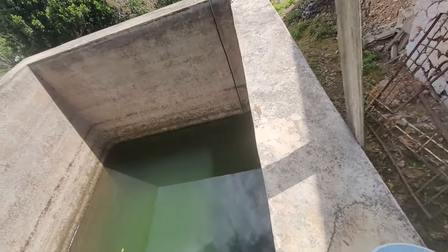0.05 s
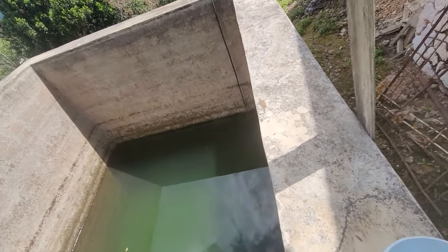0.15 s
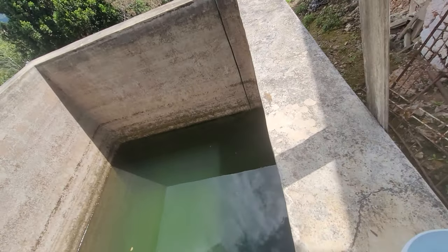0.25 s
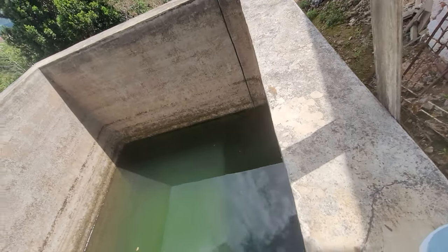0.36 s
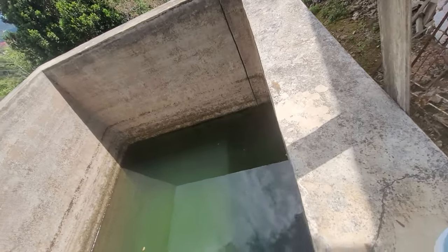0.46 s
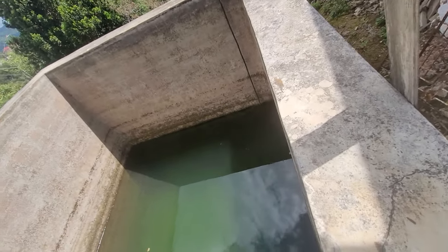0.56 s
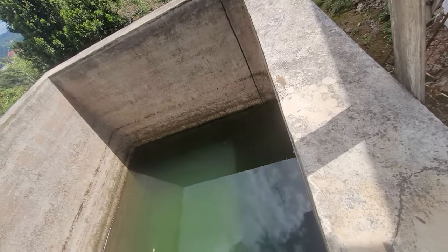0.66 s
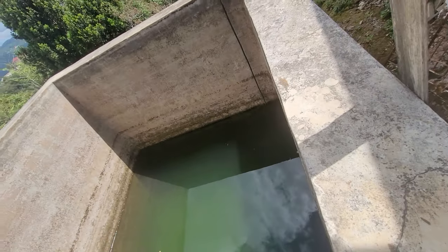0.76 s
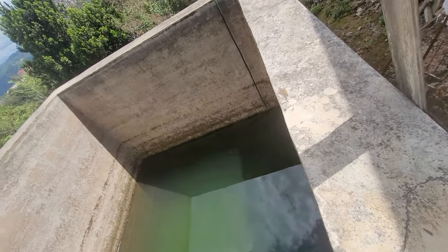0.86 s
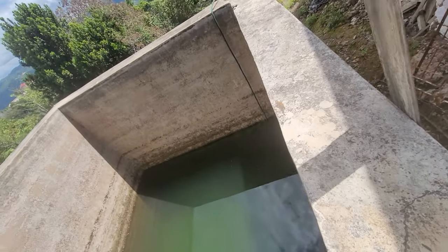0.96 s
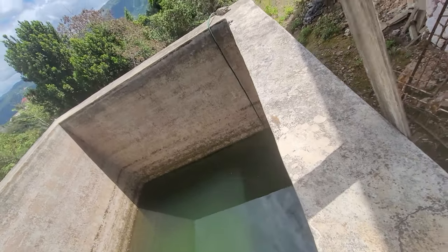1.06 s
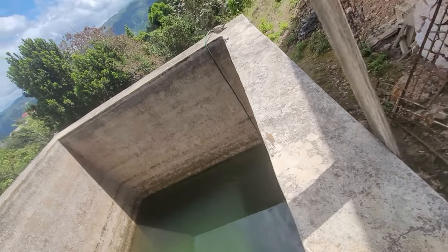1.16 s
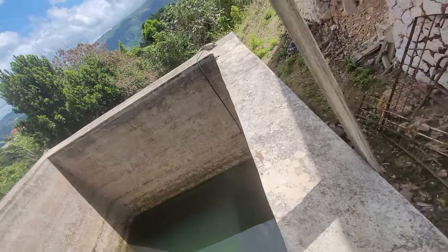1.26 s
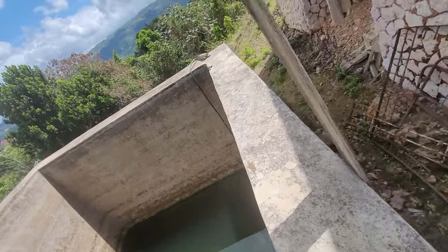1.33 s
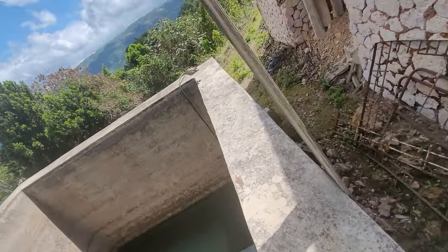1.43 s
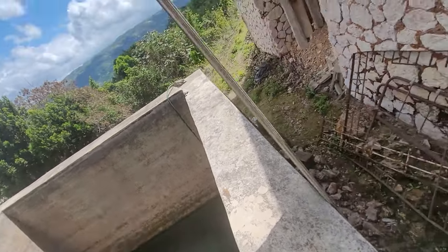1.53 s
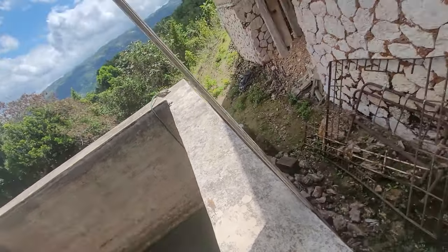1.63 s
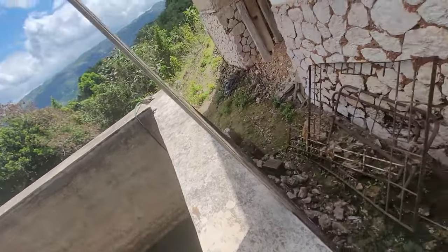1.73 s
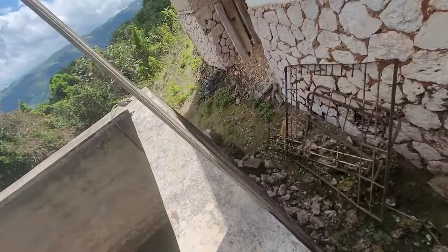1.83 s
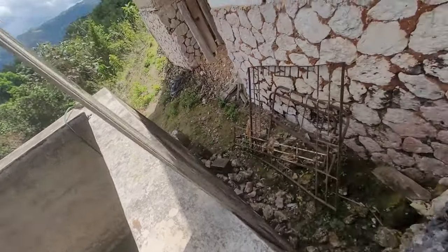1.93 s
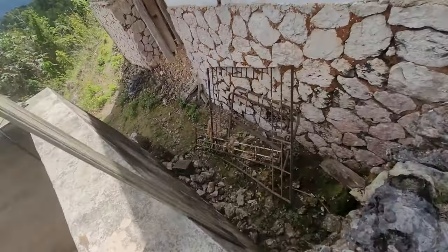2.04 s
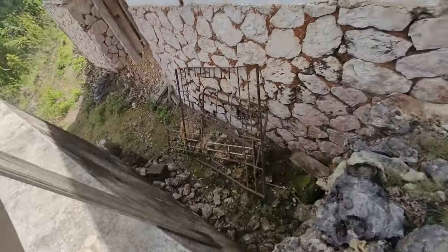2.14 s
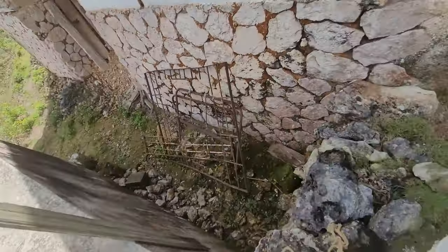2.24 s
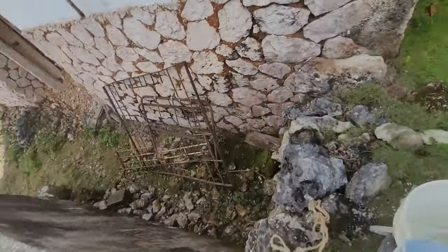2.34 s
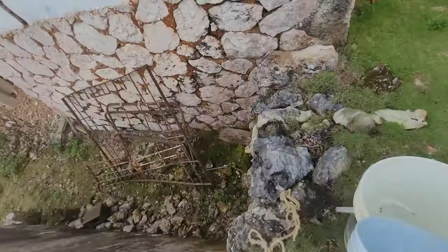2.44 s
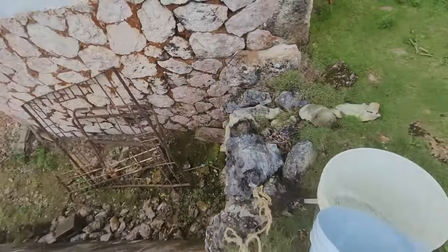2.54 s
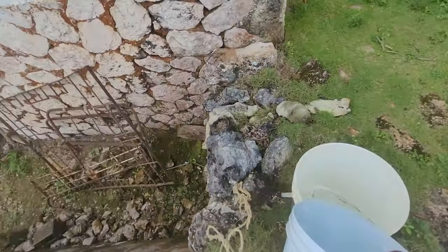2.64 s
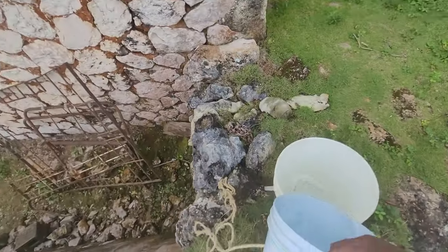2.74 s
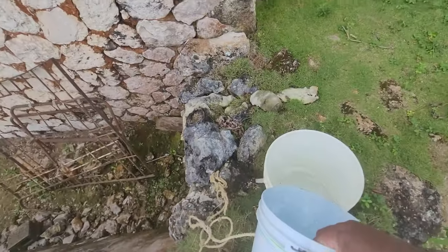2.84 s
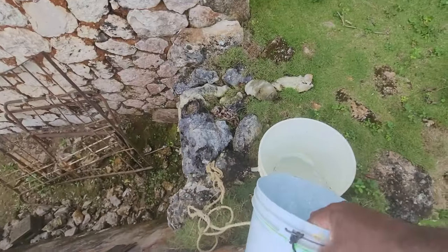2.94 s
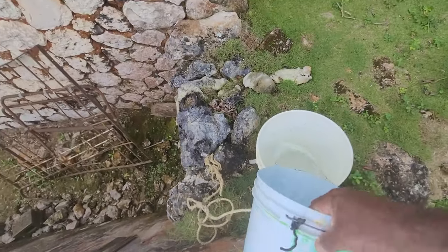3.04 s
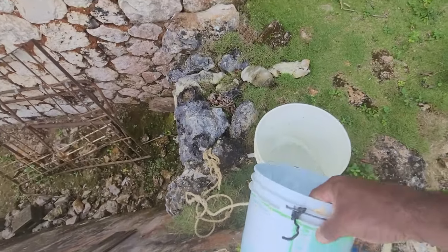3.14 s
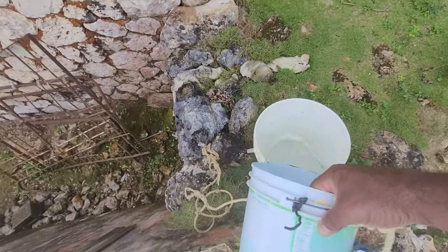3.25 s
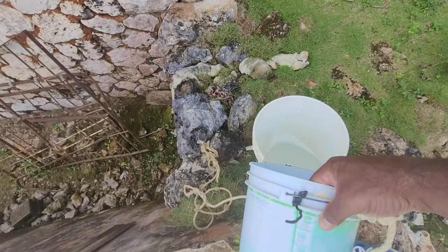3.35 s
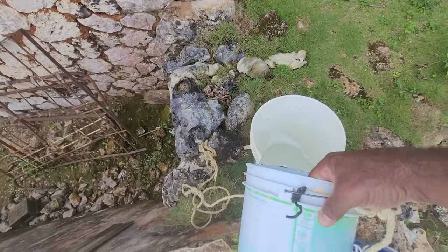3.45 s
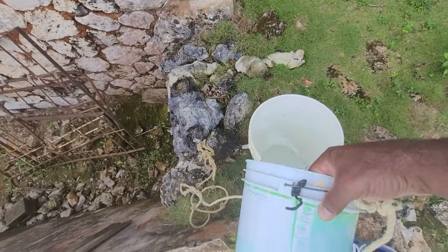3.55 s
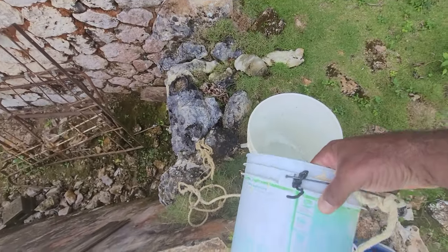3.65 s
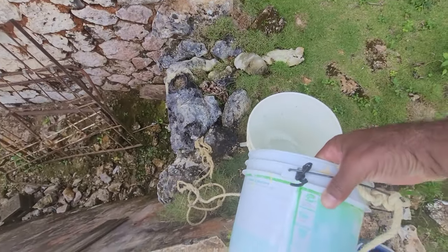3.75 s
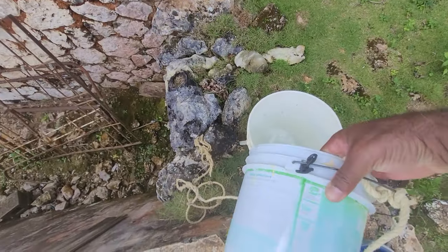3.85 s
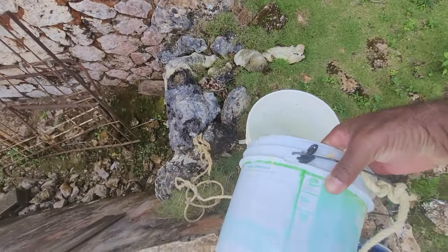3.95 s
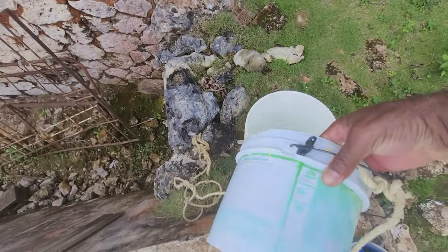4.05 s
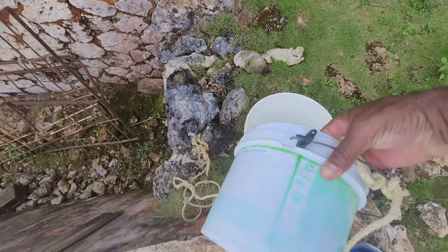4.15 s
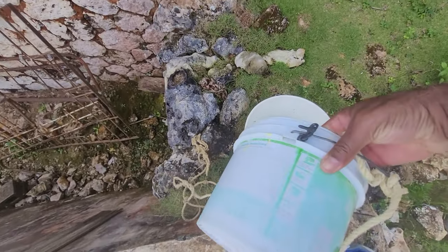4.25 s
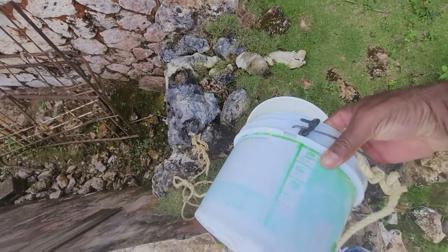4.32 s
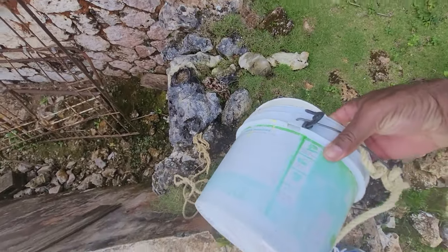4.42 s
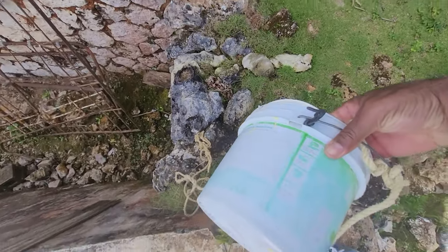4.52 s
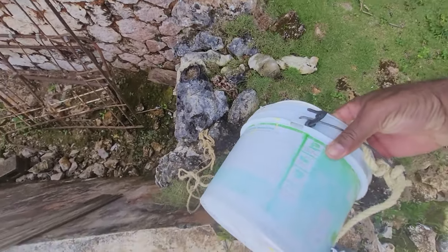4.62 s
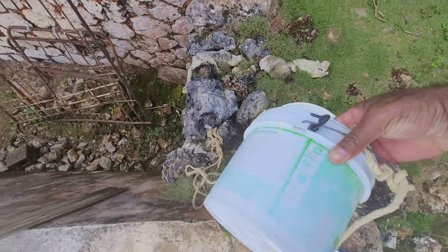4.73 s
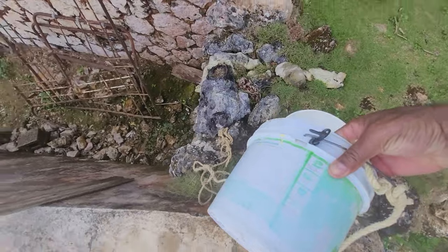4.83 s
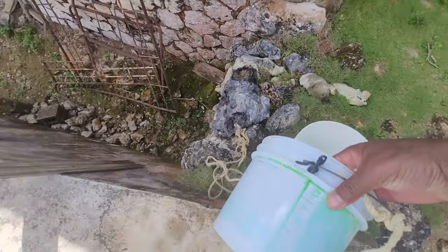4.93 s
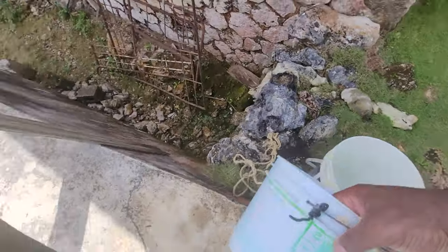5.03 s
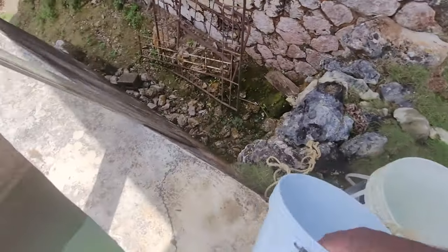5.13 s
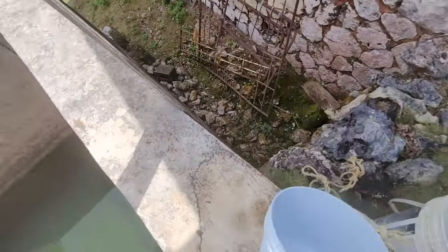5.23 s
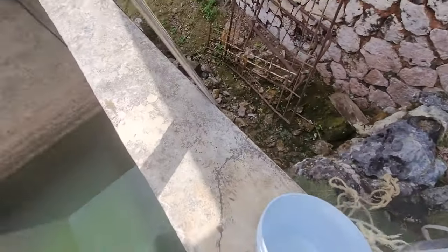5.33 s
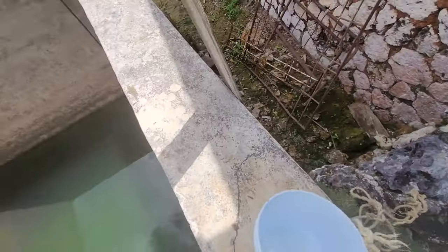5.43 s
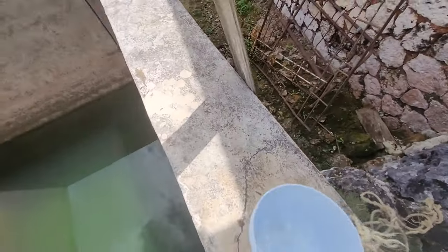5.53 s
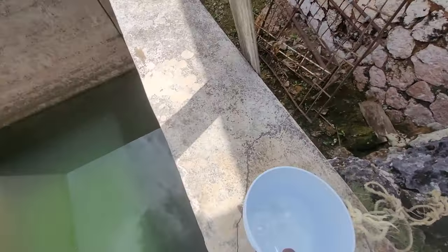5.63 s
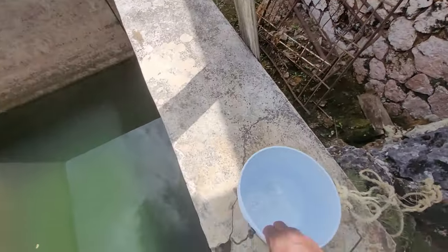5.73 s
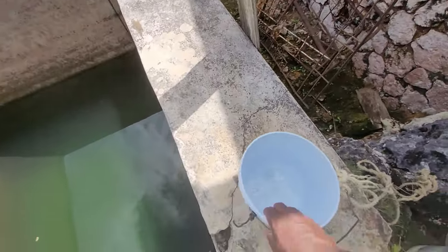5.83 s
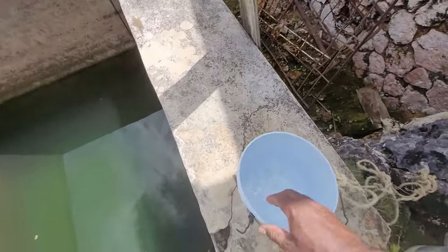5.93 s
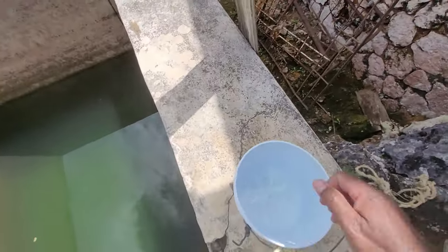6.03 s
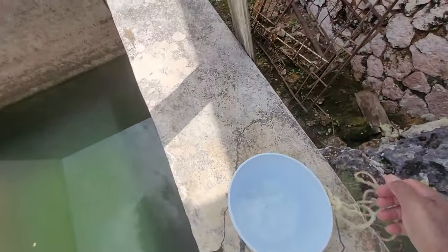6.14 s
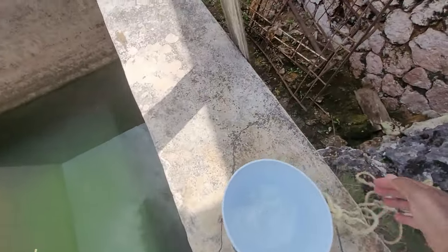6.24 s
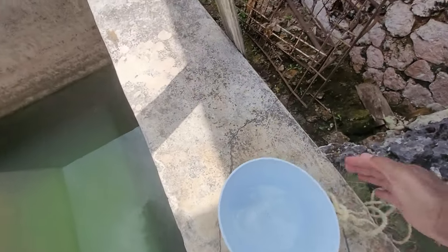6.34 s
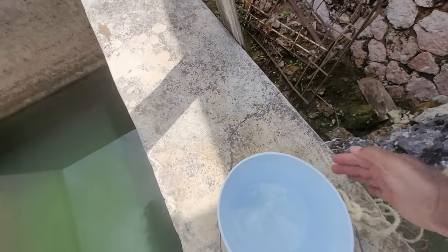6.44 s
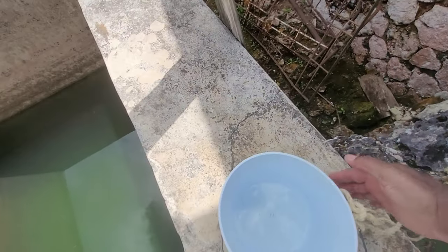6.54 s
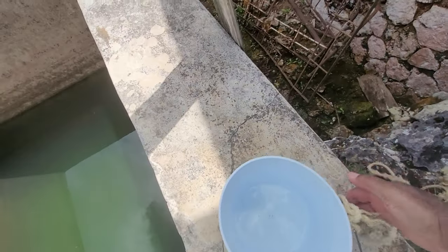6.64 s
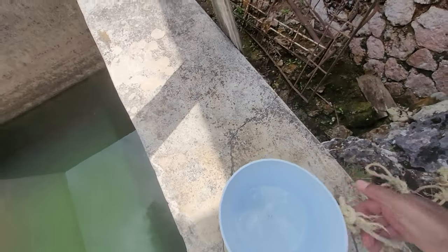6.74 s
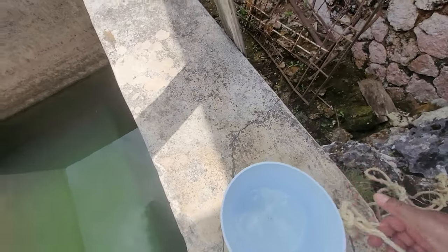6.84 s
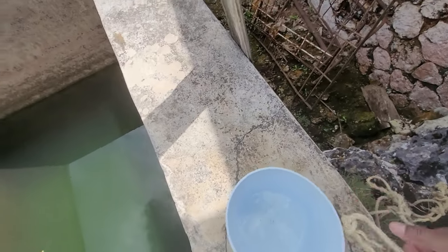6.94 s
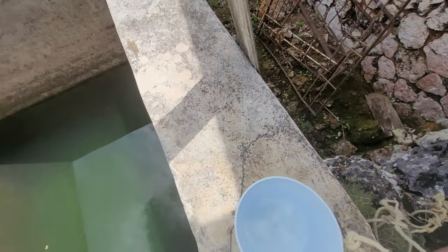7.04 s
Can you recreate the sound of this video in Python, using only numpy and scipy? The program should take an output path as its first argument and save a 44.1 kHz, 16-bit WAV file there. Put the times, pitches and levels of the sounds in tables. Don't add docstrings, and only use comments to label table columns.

```python
import sys
import numpy as np
from scipy import signal
from scipy.io import wavfile
from scipy.ndimage import uniform_filter1d

SR = 44100
rng = np.random.default_rng(int(sys.argv[2]) if len(sys.argv) > 2 else 0)


def field_ratio(decibels):
    return 10 ** (np.asarray(decibels, dtype=float) / 20)


def dump(signal):
    limited = np.clip(np.atleast_2d(signal).T, -1, 1)
    pcm = np.round(limited * 32767).astype(np.int16)
    wavfile.write(sys.argv[1], SR, pcm)


N = 312228

# pitch_hz [Hz], level_db [dB], t60_s [s to fall 60 dB]
BUCKET_TONES = [(150, -21.5, .2), (184, -14, .1), (232.8, -0.5, 0.29), (335, -17.5, 0.12),
                (395.5, -6.5, 0.17), (421, -6, 0.17), (548, -11.5, 0.11), (621, -14, 0.13),
                (782, -16, 0.094), (832, -6, 0.05), (1045, -22, 0.055), (1254, -22.5, 0.13),
                (1548, -15.5, .06), (1790, -20, .08), (2390, -11.5, 0.041), (2820, -5, .03),
                (3300, -9, .025), (3800, -15, .03), (4700, -20, .02)]
# start_s [s], peak_db [dB], pitch_hz [Hz], t60_s [s]
BUCKET_BUMPS = [(1.9, -53, 583, .2), (5.0, -50.5, 239, 0.31), (5.05, -51, 235, .3), (5.1, -46, 245, .3),
                (5.15, -47, 230, .4), (5.235, -43, 235, 0.44), (5.35, -47, 235, .2), (6.02, -30, 207, 0.093),
                (6.079, -28.5, 216, 0.051), (6.178, -32, 182, 0.077), (6.234, -30.5, 150, .06),
                (6.315, -39, 167, .08), (6.421, -26, 74.3, 0.06), (6.47, -30, 90, .08),
                (6.544, -30.5, 138, 0.064), (6.667, -39, 191, 0.14), (6.6, -36, 110, .07),
                (6.82, -40, 190, .1), (6.885, -27, 95.4, 0.048)]
# time_s [s], flow_db [dB]
WATER_FLOW = [(2.17, -41), (2.36, -42), (2.6, -47), (2.8, -46), (3.25, -39.5), (3.5, -37), (3.68, -35.5),
              (4.0, -38), (4.3, -36.5), (4.7, -40), (4.91, -49), (4.97, -62), (5.0, -66)]
# pitch_hz [Hz], level_db [dB per Hz]
SWISH_TONE = [(200, -27), (300, -9), (400, -3), (738, -8), (1030, -1), (1450, -8), (2390, -12), (2940, -30),
              (4840, -120)]


def evened(x):
    return x / np.sqrt(np.mean(x ** 2) + 1e-20)


def read(points, hz):
    f, value = np.transpose(points)
    return np.interp(np.log(hz + 1), np.log(f + 1), value)


def add(mix, s, sound):
    part = mix[..., max(round(s * SR), 0):][..., :sound.shape[-1]]
    part += sound[..., :part.shape[-1]]


def chance():
    return np.random.default_rng(rng.integers(2 ** 31))


def finer(x, count):
    return np.array([np.interp(np.arange(count), np.arange(len(row)) * 44, row) for row in x])


def wander(count, size):
    x = chance().standard_normal((count, 2)).T
    return evened(uniform_filter1d(uniform_filter1d(x, size=size), size=size))


def resonate(x, hz, width):
    turn = np.exp(2j * np.pi * np.cumsum(hz * np.ones(x.shape[-1])) / SR)
    r = np.exp(-np.pi * width / SR)
    smooth = signal.lfilter([1 - r], [1, -r], x / turn + 1e-18)
    return 2 * (turn * smooth).real


def noise(count, spectrum, size, like=0.94, lag=0., left_db=0., patchy_db=0., flicker_db=0.):
    # pitch_hz [Hz], likeness [0 to 1]
    likeness = [(60, 0.99), (300, 1), (700, 0.81), (1500, 0.46), (4000, 0.28), (10000, 0.18)]
    hop, hz = size // 2, np.fft.rfftfreq(size, 1 / SR)
    a, b, c, d, patches = chance().standard_normal((count // hop + 3, len(hz), 5)).T
    flicker = evened(uniform_filter1d(patches[1], size=2))
    patches = evened(uniform_filter1d(uniform_filter1d(patches, size=5, axis=0), size=3, axis=1))
    same = np.clip(like * read(likeness, hz), 0, 1)[:, None]
    right = a + 1j * b
    delay = np.exp(-2j * np.pi * hz * lag / SR)[:, None]
    left = same * right * delay + np.sqrt(1 - same ** 2) * (c + 1j * d)
    level_db = read(spectrum, hz)[:, None] + patchy_db * patches + flicker_db * flicker
    z = np.array([left, right]) * field_ratio(level_db)
    x = signal.istft(z, nperseg=size, noverlap=hop, window="cosine")[1][:, :count]
    return evened(x) * field_ratio(np.array([[left_db], [-left_db]]) / 2)


def nearby(x, lag, left_db, wet_db, t60):
    t = np.arange(4096) / SR
    tail = rng.standard_normal((2, len(t))) * field_ratio(-60 * t / t60) * (t > .0005)
    tail = signal.lfilter(*signal.butter(1, 700, "high", fs=SR), tail)
    tail *= field_ratio(wet_db) / np.linalg.norm(tail[0])
    tail[0, round(lag)] += 1
    tail[1, 0] += 1
    sides = field_ratio(np.array([[left_db], [-left_db]]) / 2)
    return signal.oaconvolve(x[None], tail * sides, axes=1)[:, :len(x)]


def pings(events, t60, fuzz, gain_db):
    out, t = np.zeros(N), np.arange(1200) / SR
    draws = chance().standard_normal((len(events), 2, len(t)))
    for (s, db, hz, snap_db), (grit, blur) in zip(events, draws):
        blurred = resonate(resonate(blur, hz, 1.22 * hz), hz, 1.22 * hz)
        ring = np.sin(2 * np.pi * hz * t) + fuzz * evened(blurred)
        snap = field_ratio(snap_db) * np.diff(grit, prepend=0)
        attack = np.minimum(t * hz * 2, 1)
        add(out, s, field_ratio(db + gain_db - 60 * t / t60) * (ring + snap) * attack)
    return out


def modes(table, rise, blur):
    t = np.arange(SR // 4) / SR
    ring = np.zeros(len(t))
    for hz, db, t60 in table:
        uneven = 1 + blur * wander(len(t), size=150)[0]
        ring += field_ratio(db - 60 * t / t60) * np.sin(2 * np.pi * hz * t) * uneven
    return ring * np.minimum(t / rise, 1)


def decays(rows, start, count):
    t = start + np.arange(0, count, 44) / SR
    power = np.zeros(len(t))
    for s, db, t60 in rows:
        power += np.clip((t - s) / .004, 0, 1) * field_ratio(2 * db - 120 * np.abs(t - s) / t60)
    return finer([np.sqrt(power)], count)[0]


def stroke(start, peak, t60, bend):
    t = np.arange(0, peak - start + .7 * t60, 1 / SR)
    fade = field_ratio(-60 * np.maximum(t - peak + start, 0) / t60)
    return np.minimum(t / (peak - start), 1) ** bend * fade


def background_air():
    air_tone = [(130, -13), (250, 0), (500, -8.5), (800, -15.5), (1300, -21), (3200, -24.5), (4600, -21),
                (6300, -26.5), (8000, -21.5), (10000, -27.5), (13000, -24), (16000, -25.5)]
    return field_ratio(-67.7) * noise(N, air_tone, size=1024, like=.6, patchy_db=3.0)


def wind():
    # pitch_hz [Hz], level_db [dB per Hz]
    gust_tone = [(15, -33), (30, -9.5), (55, -1.5), (75, -4.5), (110, -16.5), (170, -28.5), (300, -48.5),
                 (500, -82)]
    # peak_s [s], peak_db [dB], left_minus_right_db [dB], fall_s [s to fall 20 dB]
    gust_times = [(.08, -47, 25, .07), (.33, -64, -23, .2), (.81, -50.5, -15, .09), (.93, -58, 18, .1),
                  (1.14, -52, -29, .08), (1.28, -49, -22, .1), (1.42, -39, -37, .09), (1.61, -47, -6, .15),
                  (1.76, -40, -14, .09), (1.99, -53, -25, .1), (2.06, -47, -2, .09), (2.34, -54, -3, .12),
                  (2.5, -42, -30, .06), (2.9, -66, 0, .2), (3.45, -63, 5, .15), (4.05, -60, -1, .3),
                  (4.7, -52, 16, .25), (5.03, -40, 16, .2), (5.2, -46, -10, .2), (5.34, -41.5, 15, .11),
                  (5.55, -57, -25, .06), (5.72, -51, -3, .18), (6.26, -39.5, -7, .18), (6.5, -34, -14, .1),
                  (6.68, -43, -3, .2), (6.87, -46, -15, .1), (7.02, -57, -15, .1)]
    calm_db = -76
    t = np.arange(0, N, 44) / SR
    power = field_ratio(2 * calm_db) * np.ones((2, len(t)))
    for s, db, pan_db, fall_s in gust_times:
        share = 1 / (1 + field_ratio(-2 * np.clip(pan_db, -30, 30)))
        power = power + np.outer([share, 1 - share], field_ratio(2 * (db - 20 * np.abs(t - s) / fall_s)))
    thud = noise(N, gust_tone, size=4096, like=.15)
    lumps = wander(N, size=1200)
    return 0, evened(thud * field_ratio(2.0 * lumps)) * field_ratio(6.5) * finer(np.sqrt(power), N)


def bird():
    # start_s [s], level_db [dB], from_hz [Hz], to_hz [Hz]
    chip_calls = [
        (1.544, -79, 5200, 5770),
        (5.322, -59, 6300, 8000),
        (5.785, -58.5, 7600, 9000),
        (6.338, -56, 6260, 8400),
    ]
    out, t = np.zeros(N), np.arange(1100) / 1100
    for s, db, low_hz, high_hz in chip_calls:
        sweep = np.sin(2 * np.pi * np.cumsum(low_hz + (high_hz - low_hz) * t) / SR)
        add(out, s, field_ratio(db) * sweep * np.sin(np.pi * t) ** .5)
    echo = rng.standard_normal((2, SR // 2)) * field_ratio(-60 * np.arange(SR // 2) / SR / 0.53)
    return signal.oaconvolve(out[None], echo / np.linalg.norm(echo[0]) * 3, axes=1)[:, :N]


def insect():
    # start_s [s], peak_s [s], t60_s [s], level_db [dB]
    flight = (1.78, 2.1, 1.5, -68)
    buzz_tone = [(5500, -30), (7200, -2), (9500, -1), (11000, -30)]
    s, peak, t60, db = flight
    swell = stroke(s, peak, t60, bend=.8)
    return s, field_ratio(db) * swell * noise(len(swell), buzz_tone, size=256, patchy_db=1.5)


def drag(row, hollow, bright, bend):
    s, peak, t60, rub_db, grit_db = row
    push = stroke(s, peak, t60, bend)
    rub = noise(len(push), hollow, size=1024, lag=14, left_db=-3.0, patchy_db=2.5)
    grit = noise(len(push), bright, size=128, lag=10, left_db=-3.5, patchy_db=1.5, flicker_db=2.0)
    return s, field_ratio(rub_db + 1.5) * push * (rub + field_ratio(grit_db + 2.0) * grit)


def scrapes():
    # start_s [s], peak_s [s], t60_s [s], rub_db [dB], grit_over_rub_db [dB]
    first_shift = (.46, .53, 1.0, -58, -7)
    drag_strokes = [
        (.686, .697, .05, -51, 0),
        (.745, .803, .3, -43, -13),
        (.8, .932, .08, -42.5, -9),
        (1.87, 1.91, .55, -62, -5),
    ]
    # pitch_hz [Hz], level_db [dB per Hz]
    rub_tone = [(88, -42.5), (150, -15.5), (385, -8), (468, 0), (574, -15), (689, 0), (780, -10), (867, -5),
                (1050, -21.5), (1270, -5), (1420, -23), (1930, -19), (2370, -12), (3250, -43), (5500, -120)]
    grit_tone = [(710, -32), (1200, -8), (1310, -1), (1410, -16), (2400, -6.5), (2920, -12.5), (4500, -13),
                 (14200, -20.5), (16000, -28)]
    shift = drag(first_shift, SWISH_TONE, grit_tone, bend=.6)
    return [shift, *(drag(row, rub_tone, grit_tone, bend=.6) for row in drag_strokes)]


def swing_back():
    swing_strokes = [
        (4.97, 5.01, .3, -55, -4),
        (5.05, 5.1, .5, -51, -10),
        (5.1, 5.2, .35, -44.5, -7),
        (5.287, 5.294, .12, -42, -22),
        (5.2, 5.34, .3, -58, -12),
        (5.2, 5.32, 2.2, -76, 12),
        (5.55, 5.74, .3, -64, -6),
    ]
    # pitch_hz [Hz], level_db [dB per Hz]
    rustle_tone = [(1180, -33), (2000, -6), (2930, -4.5), (5250, -5), (8700, -11), (12000, -11),
                   (16000, -16)]
    return [drag(row, SWISH_TONE, rustle_tone, bend=1.6) for row in swing_strokes]


def handle_ticks():
    # start_s [s], peak_db [dB], pitch_hz [Hz], snap_over_peak_db [dB]
    tick_times = [(0.432, -51, 7570, -10), (0.703, -23, 2300, -17), (0.804, -29, 1260, -11),
                  (0.909, -30, 4700, -8), (0.914, -32, 1250, -14), (0.931, -33, 1200, -10),
                  (1.933, -50, 600, -20), (1.863, -42.5, 2140, -11), (2.122, -50, 2100, -4),
                  (5.009, -31, 1080, -26), (5.092, -42, 1240, -20), (5.145, -34, 1110, -23),
                  (5.293, -38, 980, -14), (6.03, -48, 2100, -17), (6.051, -44, 1760, -17),
                  (6.068, -50, 1250, -20), (6.131, -49, 2300, -10), (6.178, -41, 2600, -8)]
    # (pitch_hz [Hz], level_db [dB], t60_s [s])
    handle_clack = (.7015, -30, [(462, -6, 0.12), (673, 0, 0.12), (890, -17, .05), (1314, -12, 0.05),
                    (2121, 1, 0.035), (2347, 4, .04), (3138, 0, 0.017), (4032, 1, 0.022),
                    (5340, -5, 0.017)])
    out = pings(tick_times, t60=.014, fuzz=1.0, gain_db=-6)
    s, blow_db, tones = handle_clack
    add(out, s, field_ratio(blow_db) * modes(tones, rise=0.003, blur=0.49))
    return nearby(out, lag=9, left_db=-3, wet_db=-4, t60=.03)


def rattle():
    # start_s [s], level_db [dB], t60_s [s]
    rattle_kicks = [
        (5.809, -21, .07),
        (5.82, -35, .33),
        (5.97, -57, .8),
        (6.02, -52, .25),
        (6.176, -63, .1),
        (6.35, -74, 1.2),
    ]
    patter_tone = [(530, -39), (900, -7.5), (1370, -9.5), (1570, 1.5), (2020, -11.5), (2500, -9),
                   (4050, -20.5), (7140, -17.5), (8980, -26.5), (16000, -31)]
    s = rattle_kicks[0][0]
    patter = noise(SR, patter_tone, size=128, lag=5.2, left_db=-1.5, flicker_db=2.5)
    return s, decays(rattle_kicks, s, SR) * patter


def rocking():
    # start_s [s], level_db [dB], t60_s [s]
    wobbles = [
        (5.88, -22, .11),
        (5.9, -43, 2.6),
    ]
    s = wobbles[0][0]
    n = N - round(s * SR)
    again = [(at, db - 16, .25) for at, db, hz, _ in BUCKET_BUMPS if at > s and hz > 160]
    spectrum = [(100, 1.5), (330, 3.5), (450, 0), (600, -13), (900, -16), (1300, -31)]  # (Hz, dB per Hz)
    shake = noise(n, spectrum, size=512, flicker_db=4.0)
    low = BUCKET_TONES[:10] + [(685, -4, .2)]
    ring = sum(field_ratio(0.6 * db) * resonate(shake, hz, 33) for hz, db, t60 in low)
    return s, field_ratio(3.0) * decays(wobbles + again, s, n) * evened(ring) * signal.windows.tukey(n, .03)


def knock():
    # [extra decay rate, in tens per s]
    landing = (5.8082, -7, 5.892, 22)
    s, db, settle, damping = landing
    ring = modes(BUCKET_TONES, rise=.0007, blur=.15)
    since_flat = np.maximum(np.arange(len(ring)) / SR - settle + s, 0)
    return s, field_ratio(db) * ring * np.exp(-damping * 10 * since_flat)


def bucket_blows():
    body = np.zeros(N)
    for s, db, hz, t60 in BUCKET_BUMPS:
        add(body, s, modes([(hz, db, t60)], rise=0.0029, blur=0.23))
    add(body, *knock())
    body = signal.lfilter(*signal.butter(2, 60, "high", fs=SR), body)
    return nearby(body, lag=6, left_db=-2.0, wet_db=-5.0, t60=0.033)


def slaps_and_drips():
    # start_s [s], peak_db [dB], pitch_hz [Hz], snap_over_peak_db [dB]
    slap_times = [(2.1823, -41, 7800, 4), (2.243, -28, 4450, -9), (2.613, -27, 7950, -4),
                  (2.655, -25, 4000, 4), (2.6848, -20.5, 7430, -12), (2.8939, -27, 4070, -2),
                  (3.2269, -20.5, 2390, -13), (3.272, -20, 2980, -11), (3.4486, -19, 2300, -17),
                  (3.5158, -15, 1110, -16), (3.6386, -18, 2440, -11), (3.7426, -17, 2740, -19),
                  (3.8514, -23, 2390, -17), (3.9726, -18.5, 2440, -18), (4.2778, -16, 3700, -22),
                  (4.4971, -23, 2570, -17), (4.562, -17, 2500, 2), (4.6345, -18, 7380, -8),
                  (4.6644, -5, 4350, -25), (4.6727, -14.5, 3940, -21)]
    drip_times = [
        (4.7256, -25, 2380, -19),
        (4.7514, -21, 4100, -21),
        (4.774, -23, 2600, -17),
        (4.8354, -31, 3990, -1),
        (4.8653, -29, 2630, -16),
        (4.9095, -30.5, 7540, -11),
    ]
    drops = pings(slap_times + drip_times, t60=.014, fuzz=.7, gain_db=-5)
    return nearby(drops, lag=3, left_db=-1.5, wet_db=-5, t60=.028)


def bubbles(count, spectrum, low_hz, high_hz, per_s, cycles, spread_db):
    big, when, kind = chance().random((count, 3)).T
    size = field_ratio(-spread_db * np.log(big + .007)) * (when < per_s / SR)
    out, pitches = np.zeros(count), np.geomspace(low_hz, high_hz, 8)
    for k, hz in enumerate(pitches):
        u = np.arange(round(3 * cycles * SR / hz)) * hz / SR
        ping = np.sin(2 * np.pi * u * (1 + .008 * u)) * np.exp(-2.3 * u / cycles) * np.minimum(u, 1)
        chosen = size * (np.floor(kind * len(pitches)) == k)
        out += field_ratio(read(spectrum, hz)) * hz * signal.oaconvolve(chosen, ping)[:count]
    return evened(nearby(out, lag=4, left_db=-1.5, wet_db=0.5, t60=0.061))


def thumps(start, count):
    # start_s [s], peak_db [dB], pitch_hz [Hz], t60_s [s]
    water_lumps = [(2.233, -34, 202, 0.14), (2.282, -33, 205, 0.14), (2.323, -37, 205, 0.14),
                   (2.421, -40, 226, 0.14), (2.519, -38, 229, 0.14), (2.621, -44, 215, 0.14),
                   (2.724, -40, 207, 0.14), (2.759, -38, 210, 0.14), (2.815, -48, 237, 0.14),
                   (2.922, -33, 199, 0.14), (2.979, -36, 207, 0.14), (3.022, -39, 194, 0.14),
                   (3.105, -28, 207, 0.14), (3.153, -34, 285, 0.14), (3.189, -38, 205, 0.14),
                   (3.253, -37, 215, 0.14), (3.312, -34, 213, 0.14), (3.359, -34, 226, 0.14),
                   (3.399, -28, 221, 0.14), (3.502, -33, 310, 0.14), (3.565, -29, 221, 0.14),
                   (3.618, -31, 213, 0.14), (3.649, -29, 310, 0.14), (3.701, -32, 218, 0.14),
                   (3.79, -32, 221, 0.14), (3.832, -27, 310, 0.14), (3.869, -31, 215, 0.14),
                   (3.9, -28, 304, 0.14), (3.973, -32, 301, 0.14), (4.082, -24, 231, 0.14),
                   (4.137, -29, 229, 0.14), (4.161, -27, 283, 0.14), (4.235, -26, 285, 0.14),
                   (4.254, -25, 283, 0.14), (4.289, -28, 272, 0.14), (4.324, -29, 272, 0.14),
                   (4.357, -21, 256, 0.14), (4.428, -31, 253, 0.14), (4.486, -31, 266, 0.14),
                   (4.534, -29, 266, 0.14), (4.551, -26, 261, 0.14), (4.595, -31, 264, 0.14),
                   (4.665, -28, 301, 0.14), (4.699, -32, 261, 0.14), (4.763, -34, 248, 0.14),
                   (4.799, -33, 234, 0.14), (4.834, -40, 266, 0.14), (4.866, -33, 237, 0.14)]
    out, t = np.zeros(count), np.arange(8000) / SR
    rise = np.minimum(t / .016, 1) ** 1.5
    for s, db, hz, t60 in water_lumps:
        add(out, s - start, field_ratio(db + 5 - 60 * t / t60) * np.sin(2 * np.pi * hz * t) * rise)
    return out


def levels(start, count):
    # start_s [s], swell_db [dB], fade_s [s], extra_spray_db [dB]
    gulp_times = [(2.21, 5, .05, 0), (2.29, 5, .06, -1), (2.35, 3, .05, 3), (2.5, 5, .04, 0),
                  (2.653, 3, .09, 7), (2.735, 3, .04, 3), (2.885, 4, .04, 0), (2.968, 2, .04, 0),
                  (3.024, 2, .05, 1), (3.105, 3, .03, 0), (3.228, 5, .04, 2), (3.262, 5, .06, 0),
                  (3.383, 2, .03, 0), (3.42, 2, .03, 4), (3.445, 8, .015, -1), (3.505, 9, .04, 1),
                  (3.55, 4, .03, 1), (3.638, 6, .06, 1), (3.716, 3, .03, 0), (3.743, 4, .03, 0),
                  (3.845, 7, .04, -4), (3.973, 3, .04, 1), (4.065, 3, .04, -1), (4.15, 2, .03, 1),
                  (4.235, 4, .05, 0), (4.279, 4, .03, -1), (4.2, 3, .03, 0), (4.345, 4, .03, -2),
                  (4.4, 5, .04, 1), (4.49, 4, .03, 1), (4.558, 5, .02, 6), (4.6, 4, .03, 1),
                  (4.633, 2, .02, 6), (4.662, 4, .025, 0), (4.7, 2, .02, 2), (4.72, 3, .02, 0),
                  (4.75, 4, .02, 2), (4.775, 5, .03, 0), (4.835, 3, .03, 0), (4.905, 3, .02, 2)]
    arrive_s = [.045, .02, .008, .04]
    follow_flow = [1.0, 1.4, .9, .8]
    empty_level_db = [-37.5, -39, -34, -51]
    full_level_db = [-39.5, -41, -41.5, -46]
    gulp_part = [.75, 1.0, .8, .1]
    full_s, fill_bend = 4.3, 1.6
    t = start + np.arange(0, count, 44) / SR
    flow_db = np.interp(t, *np.transpose(WATER_FLOW)) + 40
    fill = np.minimum((t - start) / (full_s - start), 1) ** fill_bend
    s, swell_db, fade, spray_db = np.transpose(gulp_times)[..., None]
    shape = np.clip((t - s) / .006, 0, 1) * np.exp(-((t - s) / fade) ** 2)
    layers = np.array([arrive_s, follow_flow, empty_level_db, full_level_db, gulp_part])
    arrive, follow, empty_db, full_db, share = layers[..., None]
    gulp_db = share * (swell_db * shape).sum(0) + np.outer([0, 0, 1, 0], (spray_db * shape).sum(0))
    rise = np.clip((t - start - arrive) / .03, 0, 1)
    level_db = empty_db + (full_db - empty_db) * fill + follow * flow_db + gulp_db
    return finer(rise * field_ratio(level_db), count)


def pour():
    # pitch_hz [Hz], level_db [dB per Hz]
    gurgle_tone = [(220, -29), (380, 5.5), (409, -5.5), (517, -10), (677, 0), (893, -7), (1070, 0),
                   (1360, -5.5), (1470, -2), (1650, -14), (2140, -38.5), (3630, -120)]
    slap_tone = [(1000, -32), (1700, -3.5), (1860, -1.5), (2140, -6.5), (2330, -0.5), (3500, -5.5),
                 (4550, -35.5), (7700, -120)]
    spray_tone = [(2120, -33), (3600, -5.5), (3760, -2.5), (4080, -3), (6350, -7), (7660, -5.5),
                  (8950, -12), (11500, -7), (15100, -12), (16000, -22.5)]
    # time_s [s], pitch_hz [Hz]
    boom_pitch = [
        (2.17, 201),
        (3.3, 223),
        (3.8, 250),
        (4.25, 274),
        (5.0, 244),
    ]
    s = WATER_FLOW[0][0]
    n = round((WATER_FLOW[-1][0] - s) * SR)
    gurgling, slapping, spraying, booming = levels(s, n)
    gurgle = noise(n, gurgle_tone, size=512, lag=5.4, left_db=-1.5, patchy_db=2.5, flicker_db=0.5)
    gurgle = gurgle + field_ratio(-2) * bubbles(n, gurgle_tone, 450, 1500, per_s=250, cycles=8.9, spread_db=3.0)
    slap = noise(n, slap_tone, size=256, lag=4, left_db=-5.0, patchy_db=3.0, flicker_db=0.5)
    slap = slap + field_ratio(-1.5) * bubbles(n, slap_tone, 1735, 3400, per_s=330, cycles=9, spread_db=4.0)
    spray = noise(n, spray_tone, size=128, lag=1.62, left_db=-.8, patchy_db=2.5, flicker_db=1.87)
    spray = spray + field_ratio(-6.5) * bubbles(n, spray_tone, 3600, 8500, per_s=280, cycles=7.1, spread_db=3.5)
    drum = noise(n, [(60, -25), (120, 0), (400, 1), (700, -32.5)], size=2048)
    boom_hz = np.interp(s + np.arange(n) / SR, *np.transpose(boom_pitch))
    boom = evened(resonate(resonate(drum, boom_hz, 68), boom_hz, 71) + 0.3 * drum)
    surge = field_ratio(.7 * wander(n, size=900)[0])
    water = gurgling * evened(gurgle * surge) + slapping * evened(slap * surge)
    water += spraying * evened(spray * surge) + booming * boom
    water += thumps(s, n)
    return s, water * signal.windows.tukey(n, .008)


def scene():
    mix = background_air() + bird()
    for part in (wind(), insect(), *scrapes(), *swing_back(), rattle(), rocking(), pour()):
        add(mix, *part)
    return mix + handle_ticks() + bucket_blows() + slaps_and_drips()


def roll_off(x):
    return signal.sosfilt(signal.butter(12, 17000, fs=SR, output="sos"), x)


def record(dry):
    low_pass = signal.firwin(511, 15900, window=("kaiser", 8), fs=SR)
    limited = signal.oaconvolve(dry, low_pass[None], "same", axes=1)
    return roll_off(np.clip(limited, -.99, .99))


dry = scene()
out = record(dry)
dump(out)
```